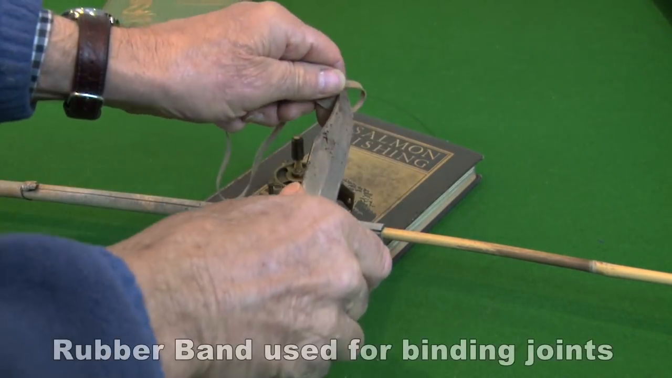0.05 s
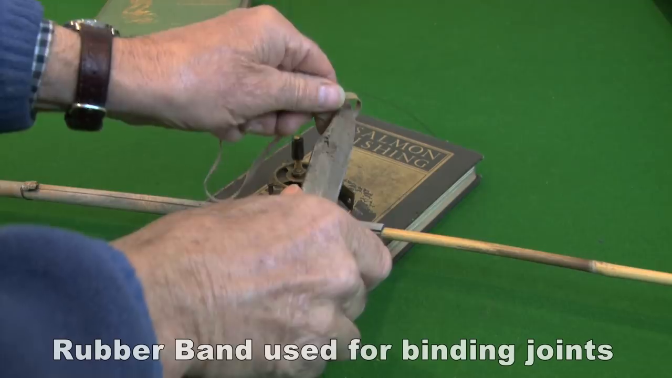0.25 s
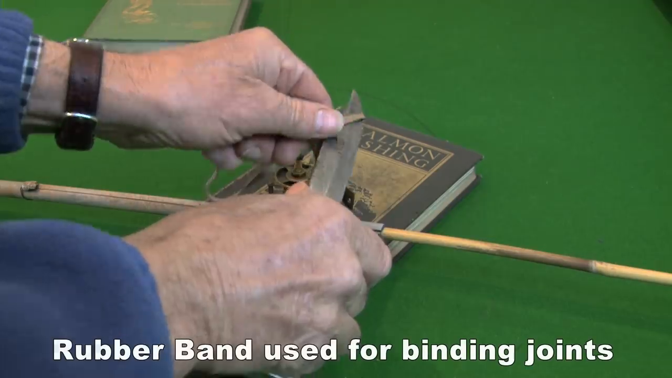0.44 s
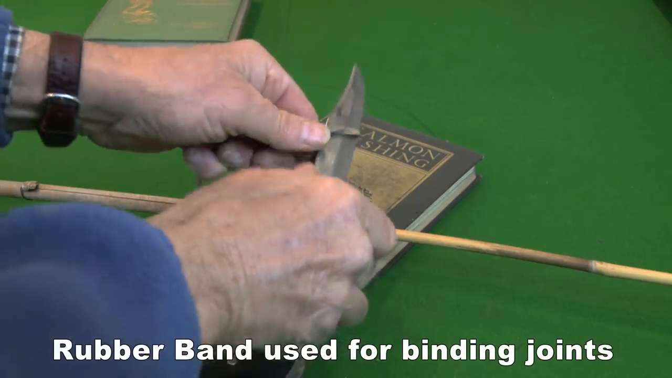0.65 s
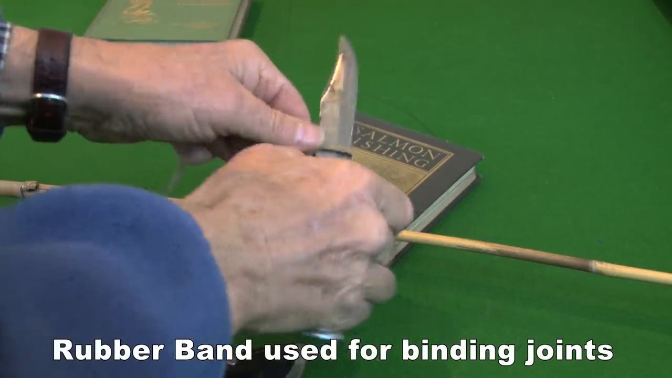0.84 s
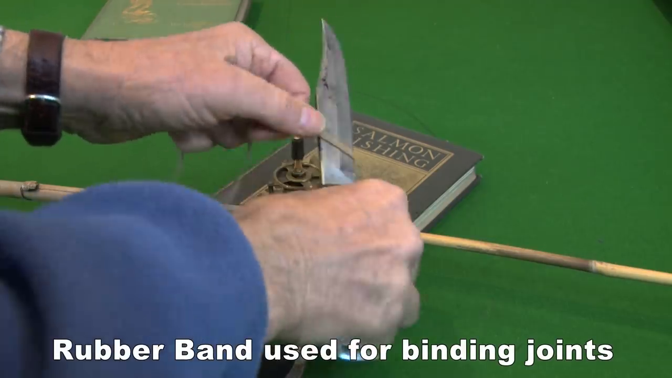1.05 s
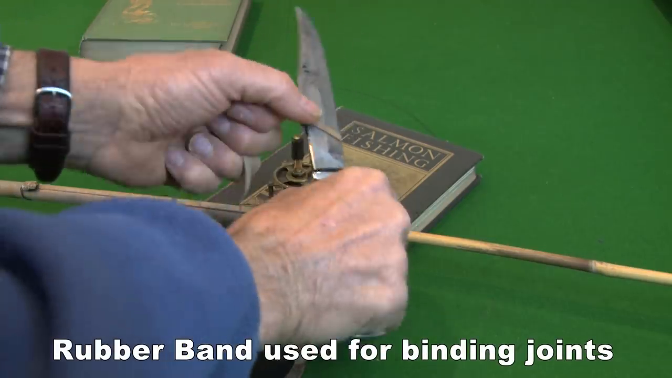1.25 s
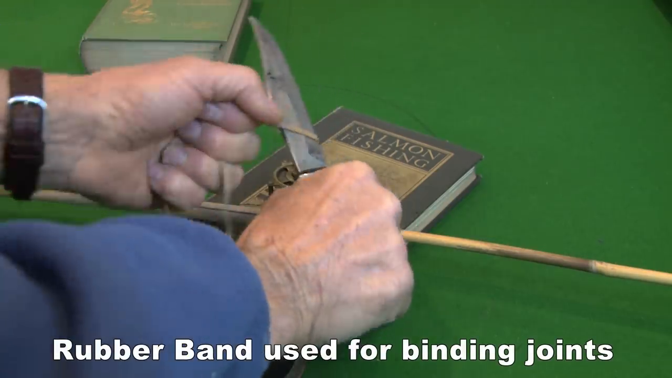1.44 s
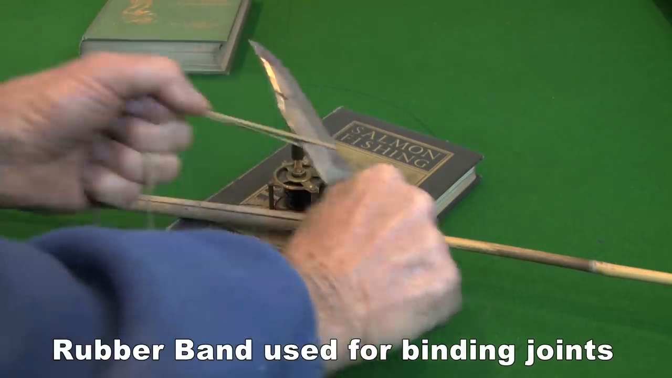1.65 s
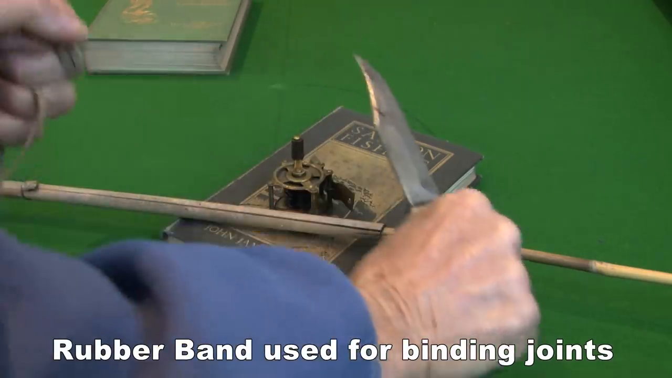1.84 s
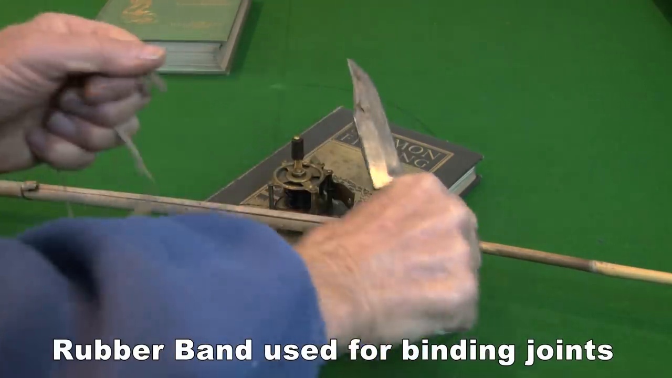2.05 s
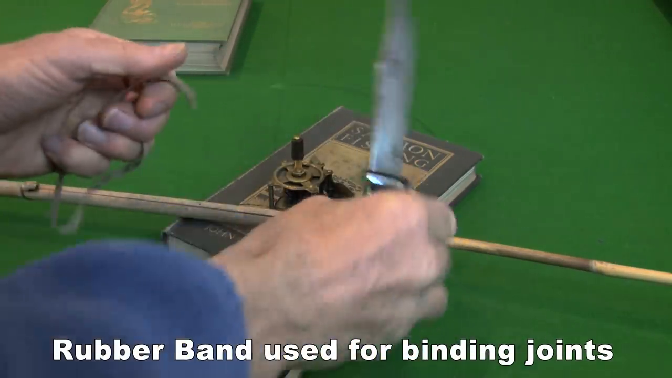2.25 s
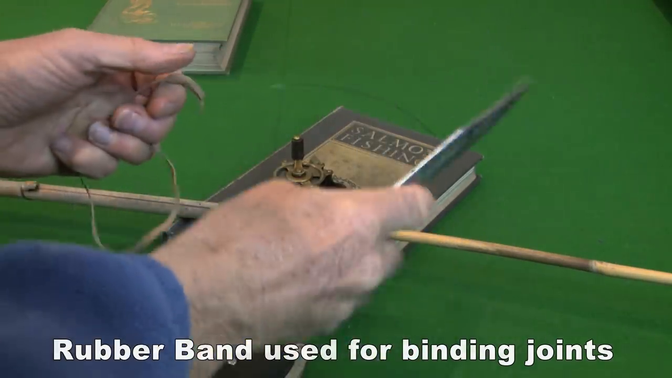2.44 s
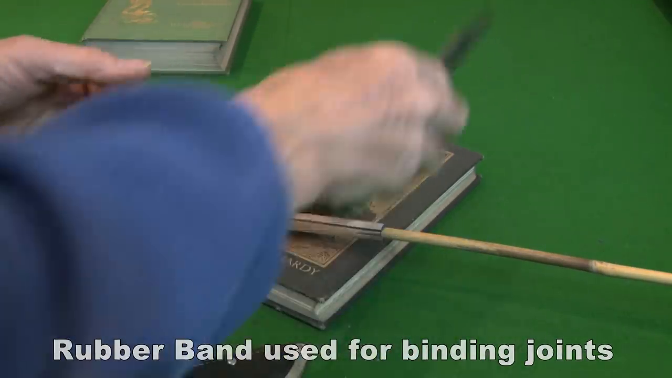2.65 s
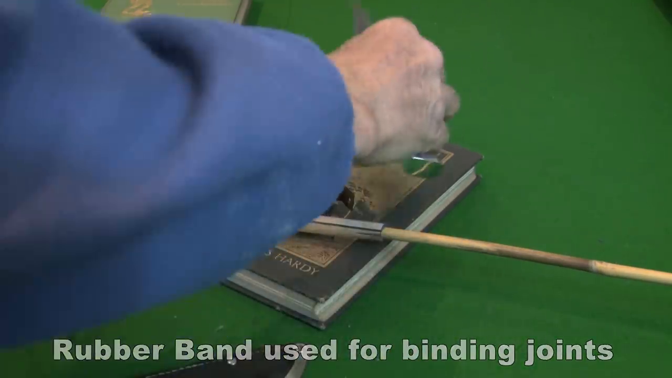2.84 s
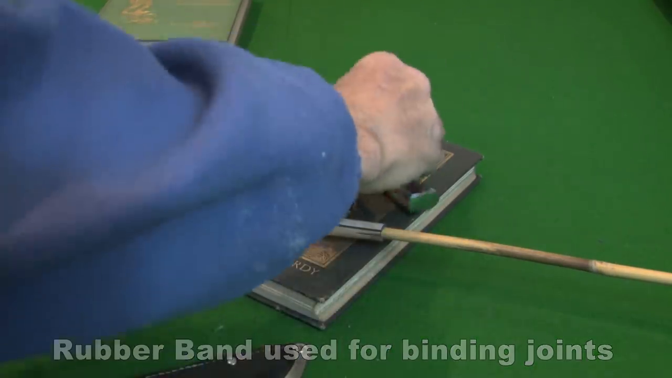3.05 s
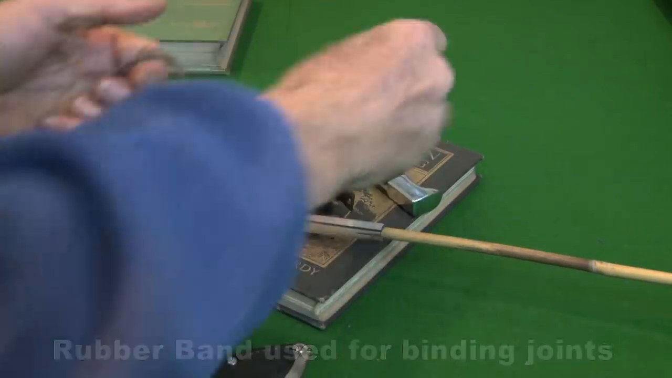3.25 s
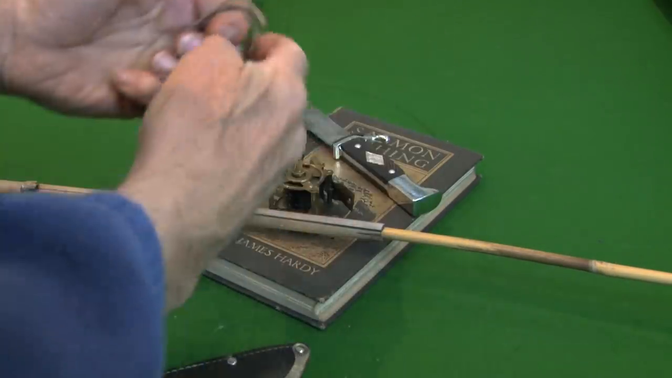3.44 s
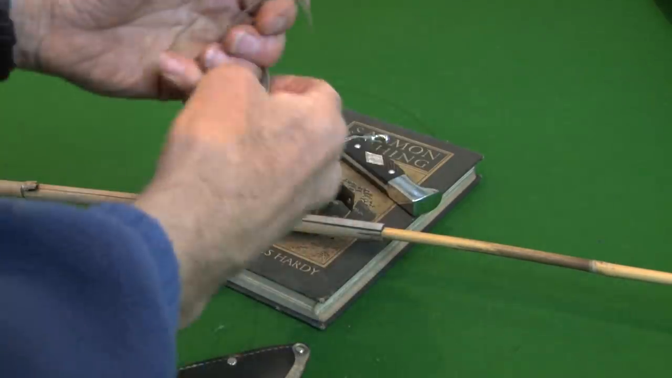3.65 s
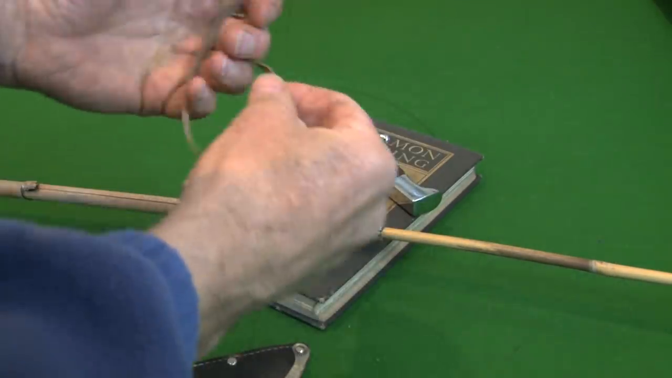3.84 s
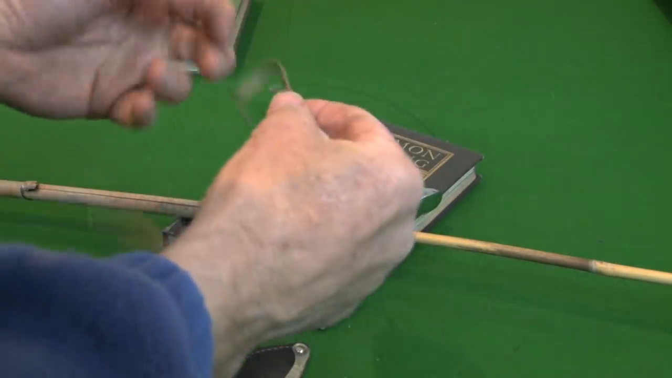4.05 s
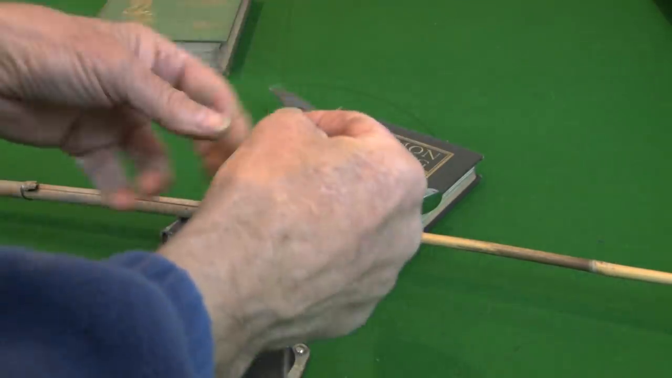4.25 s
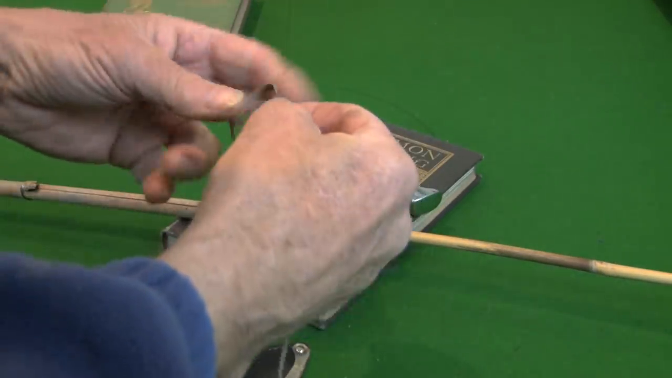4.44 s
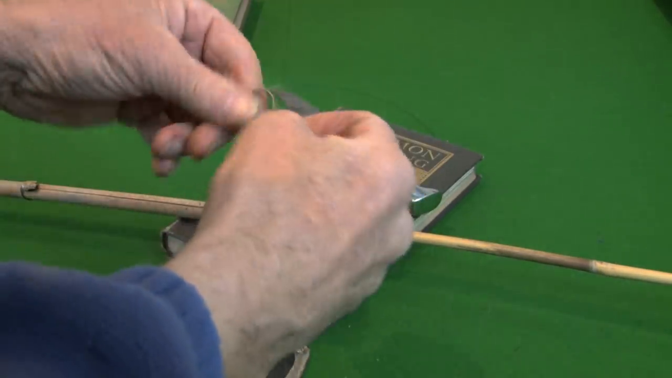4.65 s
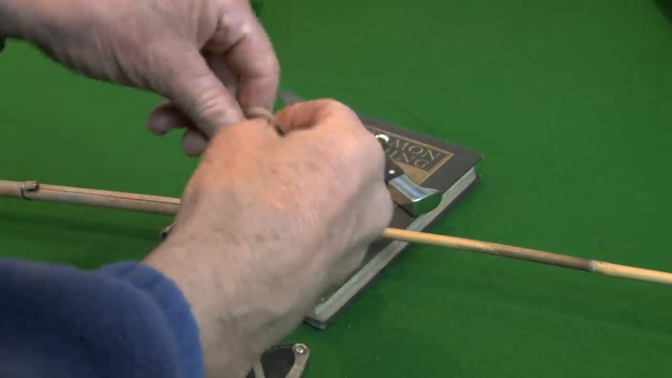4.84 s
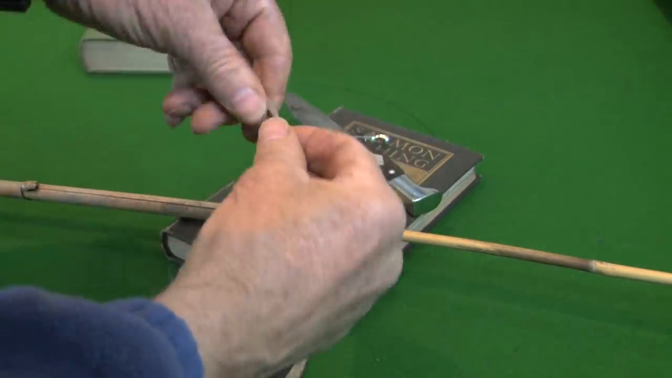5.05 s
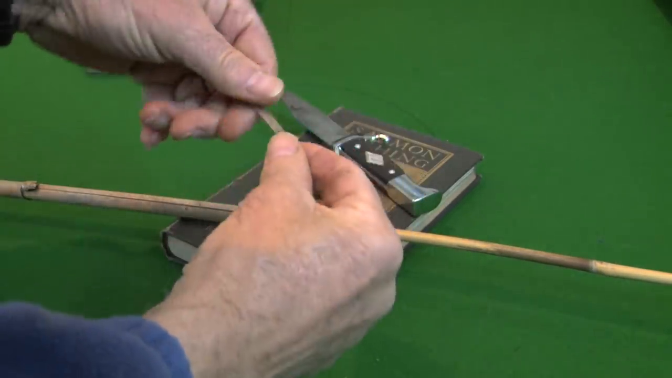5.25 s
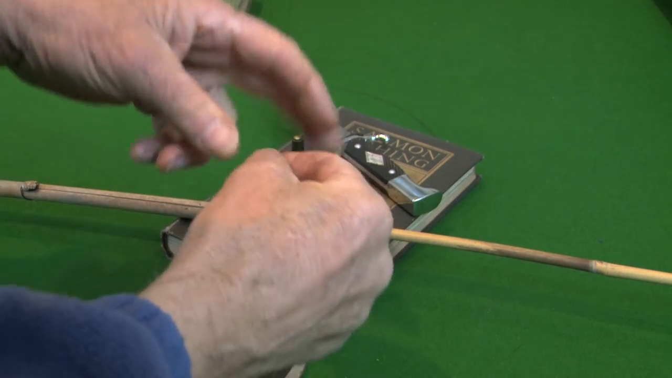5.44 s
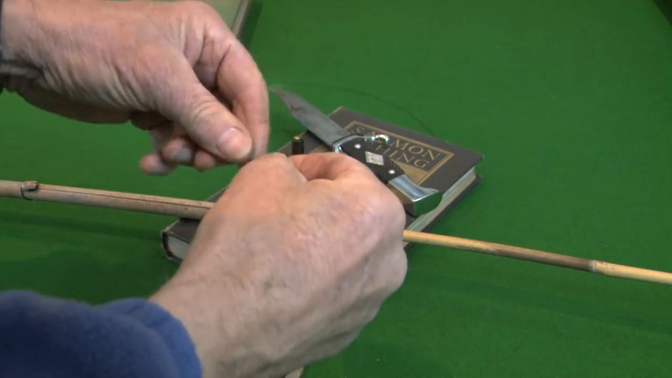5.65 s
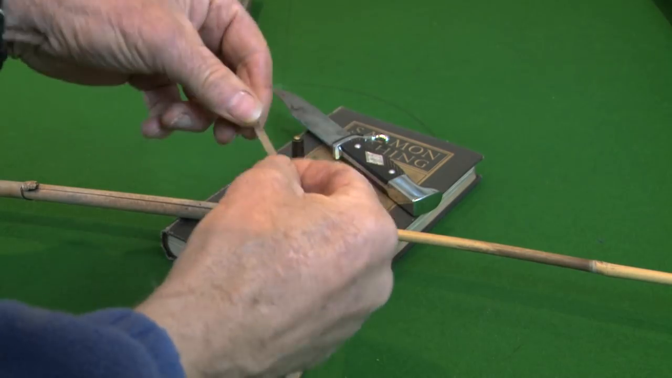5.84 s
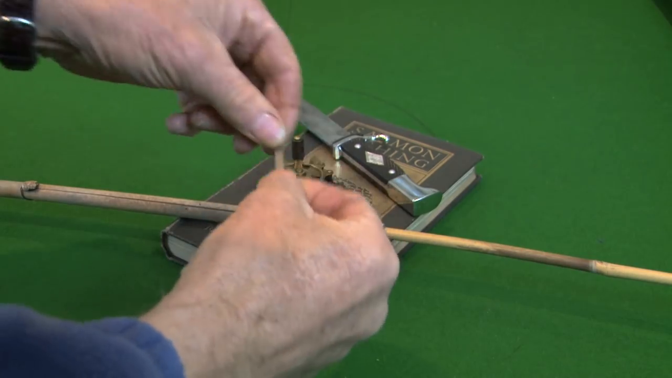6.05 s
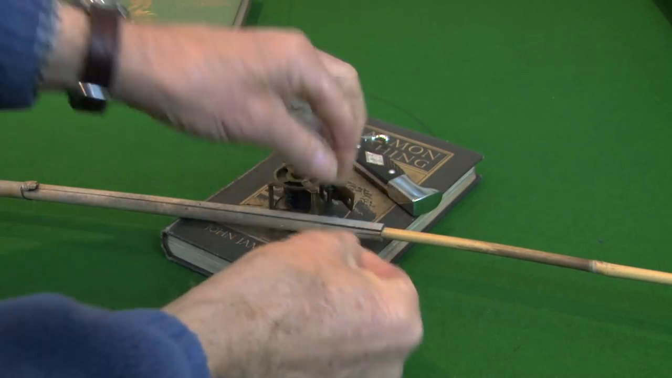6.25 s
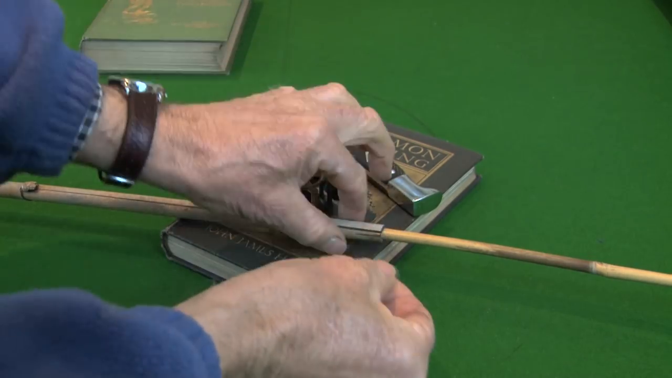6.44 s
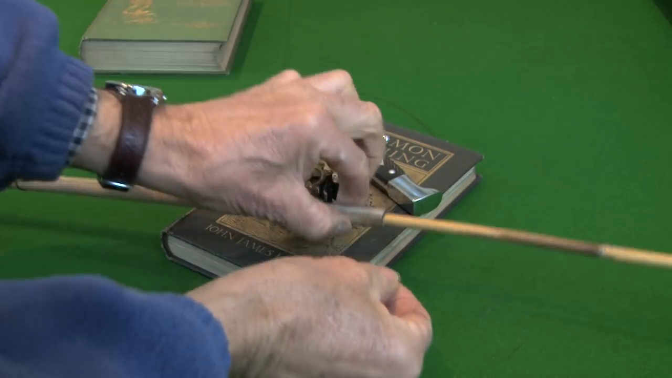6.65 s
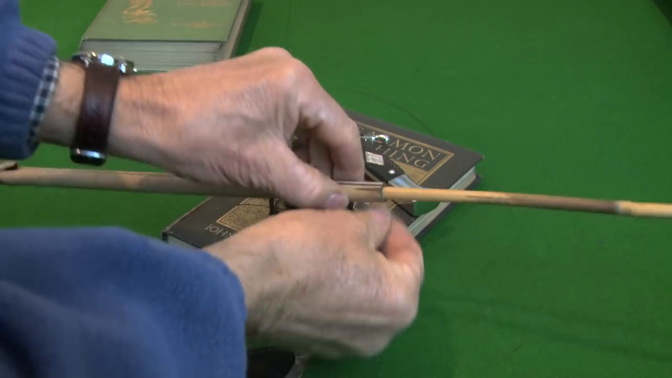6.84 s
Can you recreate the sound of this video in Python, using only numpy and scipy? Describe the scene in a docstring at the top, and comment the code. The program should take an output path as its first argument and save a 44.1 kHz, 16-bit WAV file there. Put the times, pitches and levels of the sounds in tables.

```python
"""A stretched rubber band is cut on a knife in a quiet furnished room, over a low rumble and a faint hiss.
Fingers rub and sleeves drag; near 1 s the taut band slides down the blade and squeaks. At 1.7 s it parts
with a dry crack and a puff of air. Around 3 s the knife is laid rocking on a hardback book, whose modes
knock under it. Near 4 s the rubber strip is drawn through the fingers and slips off with a creak. Small
things tick, and a few light knocks follow at 6.4 s. A closely spaced microphone pair hears it all."""
import sys
import numpy as np
from scipy import signal
from scipy.io import wavfile

SR = 44100
rng = np.random.default_rng(int(sys.argv[2]) if len(sys.argv) > 2 else 0)


def generate_wav(sig):
    """Save sig (samples, or channels by samples) to the path in sys.argv[1] as 16-bit PCM at SR."""
    pcm = np.round(np.clip(np.atleast_2d(sig).T, -1, 1) * 32767).astype(np.int16)
    wavfile.write(sys.argv[1], SR, pcm)


N = 304290

SNAP_DB = 6   # gain on the whole snap, on top of the levels below
PUFF_DB, PUFF_HZ = -45, 45.32   # the hands jerk apart and a puff of air reaches the microphones
OVERTONE_RATIO, OVERTONE_DB = 1.9, -6
# The parting band whips against blade and fingers within four milliseconds.
# Each row: start in seconds, crack level in dB, crack pitch in Hz, air push level in dB.
WHIPS = [(1.7206, -15, 4300, -20), (1.72165, -6, 6600, -10), (1.7223, -14, 6900, -22),
         (1.72255, -11, 2400, -30), (1.7231, -14, 4800, -26), (1.7243, -27, 6900, -40)]
def band_snap():
    """Each whip is a crack of a few cycles riding on a slower push of air; only the cracks echo."""
    cracks, pushes = np.zeros((2, N))
    t = np.arange(SR // 10) / SR
    for s, crack_db, hz, push_db in WHIPS:
        t60 = 5 / hz
        crack = ring(hz, t60, t) - from_db(OVERTONE_DB) * ring(OVERTONE_RATIO * hz, t60, t)
        add(cracks, s, -from_db(crack_db) * crack)
        add(pushes, s - .0005, from_db(push_db) * ring(600, .003, t))
    add(pushes, WHIPS[1][0], from_db(PUFF_DB) * ring(PUFF_HZ, 0.1, t))
    left = signal.lfilter([.7, .3], [1], cracks)   # reaches the left microphone 0.3 samples later
    crack_pair = panned(np.array([left, cracks]), pan_db=-.6)
    return from_db(SNAP_DB) * (echoes(crack_pair) + panned(pushes, pan_db=2.0))


def snap_in_room(db=6.5, low_cut_hz=496):
    """Towards the walls the whips merge into one broad crack, thin in the bass."""
    out = np.zeros(N)
    add(out, WHIPS[1][0], from_db([db]))
    return butter(out, 1, low_cut_hz, "high")


RATTLE_DB, RATTLE_T60_S = -9, 0.081   # the knife's rattle, against its edge clack
COVER_HZ, KNOCK_TOP_HZ = 3400, 11500   # the yielding, cloth-covered board dulls each knock
# The modes of the book, then of the knife's hard edge.
# Each row: pitch in Hz, level in dB, time to fall 60 dB in seconds.
BOOK_MODES = [(60.8, -25, 0.69), (107, -21, 0.27), (211.7, -5, 0.042), (302, -3.5, 0.022),
              (414, -5.5, 0.035), (560, -2, 0.013), (884, 7.5, 0.006), (1005, 9, 0.0061), (1328, 2, 0.013),
              (1470, -0.5, 0.011), (2120, -9.5, 0.0054)]
EDGE_MODES = [(2710, -0.5, 0.0055), (3100, -7.5, 0.0038)]
# Hard things land on book and table. Each row: start in seconds, level in dB, contact sharpness in Hz,
# then trims in dB for the edge clack, the two lowest modes and the cover's drum tone.
KNOCKS = [(1.9927, -35.5, 383, -33, -3.5, 2), (2.9930, -23.5, 413, -16.5, -6, -3),
          (3.0251, -18, 1730, -8, -20, 2), (3.031, -26.5, 910, -31, 14, 7.5),
          (3.037, -23, 1000, -16, 9.5, 1), (3.0670, -25, 590, -35, -14, 1),
          (3.0731, -17.5, 1380, -19, -16, -2), (3.0850, -23.5, 900, -13, -17, 2),
          (3.0915, -25.5, 900, -6, 9, 4.5), (3.1451, -21.5, 1110, -18.5, -3, -2),
          (3.1769, -26, 700, -18, 6.5, -1), (6.392, -50, 1500, -18, -15, -2),
          (6.4455, -33.5, 630, -29, -20, -2), (6.4846, -38, 480, -25, -10, -12),
          (6.509, -39.5, 700, -16, 4, 1), (6.516, -42, 700, -20, -17, -10),
          (6.529, -40.5, 690, -19, -20, 2.5), (6.541, -45, 900, -26, -20, 0)]
def knocks():
    """A soft contact excites the book's modes anew each time; a hard edge clacks and rattles on top."""
    out, t = np.zeros(N), np.arange(SR // 2) / SR
    scatters_db = rng.normal(0, 1.5, (len(KNOCKS), len(BOOK_MODES)))
    rattles = np.diff(rng.standard_normal((len(KNOCKS), len(t) + 1)))
    rattles *= from_db(RATTLE_DB - 60 * t / RATTLE_T60_S)
    clack = sum(from_db(db) * ring(hz, t60, t) for hz, db, t60 in EDGE_MODES)
    for knock, scatter_db, rattle in zip(KNOCKS, scatters_db, rattles):
        s, db, sharp_hz, edge_db, weight_db, drum_db = knock
        body = 0
        for k, (hz, mode_db, t60) in enumerate(BOOK_MODES):
            trim_db = scatter_db[k] + weight_db * (k < 2) + drum_db * (k == 2)
            strength = from_db(mode_db + trim_db) / (1 + (hz / sharp_hz) ** 2)
            body += strength * (-1) ** k * ring(hz, t60, t)   # neighbours start in opposite senses
        body = butter(body, 1, 2.25 * sharp_hz)   # the contact time rounds the onset
        add(out, s, -from_db(db) * (body + from_db(edge_db) * (clack + rattle)))
    return below(KNOCK_TOP_HZ, butter(out, 3, COVER_HZ))


LOWER_RING_RATIO = 0.387
# Nails, rubber and metal tick; the row at 4.457 s is instead a faint, lingering tone near 1.7 kHz.
# Each row: start in seconds, level in dB, pitch in Hz, resonance Q,
# time for the wake to fall 60 dB in seconds, lower ring in dB against the upper.
TICKS = [(0.923, -52.5, 6500, 1, 0.011, -9), (2.165, -63.5, 7200, 5.7, 0.027, -30),
         (2.184, -57, 8060, 1.7, 0.019, -29.5), (2.225, -54.5, 7100, 1.2, 0.0055, -33),
         (2.231, -53, 7800, 1.8, 0.0054, -28), (2.307, -59.5, 7130, 1.1, 0.0052, -30),
         (2.444, -62.5, 4200, 9.2, 0.022, -16.5), (2.623, -61, 4250, 13, 0.028, -35),
         (3.0262, -46.5, 6400, 2.4, 0.0035, -32), (3.0738, -42, 7800, 1.7, 0.0035, -28),
         (3.0746, -41, 4440, 2, 0.0031, 4), (4.0439, -38, 3100, 3.1, 0.001, -27),
         (4.0442, -39, 1900, 0.94, 0.0011, -30), (4.148, -46.5, 1320, 3, 0.0059, -7.5),
         (4.1692, -41, 2400, 2.3, 0.0096, -9), (4.172, -41, 5430, 0.78, 0.0095, -23),
         (4.457, -64, 1740, 7.6, 0.51, -34), (5.278, -51, 7100, 0.38, 0.06, -29.5),
         (5.283, -47.5, 6840, 0.56, 0.022, -4.5), (5.668, -51, 6000, 0.35, 0.021, -5),
         (6.388, -57, 6730, 0.7, 0.051, -14), (6.4473, -49, 2520, 0.36, 0.0052, -25),
         (6.511, -64, 2800, 4.5, .02, -9), (6.517, -55, 4300, 2.6, 0.036, -30),
         (6.522, -61, 1970, 5, 0.066, -30), (6.53, -54, 4400, 1.1, 0.013, -14)]
def ticks():
    """A sharp click with a noisy wake rings an upper and a lower resonance."""
    out, t = np.zeros(N), np.arange(SR // 5) / SR
    for s, db, hz, q, t60, lower_db in TICKS:
        wake = rng.standard_normal(len(t)) * from_db(-60 * t / t60)
        burst = 2.6 * (t == 0) + wake
        for ring_hz, ring_db in [(hz, db), (LOWER_RING_RATIO * hz, db + lower_db)]:
            peak = np.concatenate(signal.iirpeak(ring_hz, q, fs=SR))
            rung = signal.sosfilt([peak] * 3, burst)
            add(out, s, from_db(ring_db) * rung / np.max(np.abs(rung)))
    return out


def creak(start_s=4.047, end_s=4.125, slips_per_s=83, db=-51, hz=9650):
    """Rubber slips off skin in a short, slightly uneven train of bright clicks."""
    out, t = np.zeros(N), np.arange(SR // 200) / SR
    for s in np.arange(start_s, end_s, 1 / slips_per_s):
        late, size = rng.standard_normal(2)
        add(out, s + 0.00084 * late, from_db(db + 2.7 * size) * ring(hz, 0.00094, t))
    return out


WAVER_DB = 3.0   # each squeak and each blade mode comes and goes by itself
# The band rubs along the blade. Each row: start in seconds, hold in seconds, level in dB.
SLIDES = [(0.925, 0.05, -68), (0.985, 0.112, -64), (1.12, 0.059, -71)]
# The colour of that rub. Each row: centre in Hz, width in Hz, level in dB.
SLIDE_MODES = [(937, 40, -14), (2370, 120, -12), (1300, 1800, 0)]
# The band groans and squeaks as it slips.
# Each row: start in seconds, hold in seconds, level in dB, pitch in Hz, pitch wander in Hz.
SQUEAKS = [(0.975, .045, -65, 668, 40), (1.04, .17, -68, 665, 70), (0.935, .06, -69, 1815, 20),
           (1.01, .15, -73, 1840, 20), (1.0, .135, -67, 1494, 8)]
def sliding_band():
    """The taut band slides down the blade and sings: wavering tones over a broad rub."""
    slopes = dict(rise_db_per_s=510, fall_db_per_s=148)
    tones = sum(strokes([(s, hold, db)], **slopes) * squeak(hz, wander_hz)
                for s, hold, db, hz, wander_hz in SQUEAKS)
    return strokes(SLIDES, **slopes) * resonant(SLIDE_MODES) + tones


def squeak(hz, wander_hz, wanders_per_s=70):
    """A tone of slipping rubber whose pitch and strength waver; rms 1."""
    phase = 2 * np.pi * np.cumsum(hz + wander_hz * drift(wanders_per_s)) / SR
    return rms_one(from_db(WAVER_DB * drift(wanders_per_s)) * np.sin(phase))


# The modes of the knife blade. Each row: centre in Hz, width in Hz, level in dB.
BLADE_MODES = [(3140, 110, 2.5), (4200, 250, 0.5), (5450, 220, -3), (6800, 260, 5), (7300, 240, 0),
               (8050, 240, -2), (10600, 600, -4)]
# Fingers and rubber brush the blade.
# Each row: start in seconds, hold in seconds, level of the lower modes in dB, of the upper modes in dB.
BRUSHES = [(0.352, 0.08, -88, -83), (0.448, 0.1, -81, -80), (0.67, 0.069, -86, -81),
           (0.92, 0.035, -77, -76), (1.0, 0.062, -76, -79), (1.093, 0.034, -75, -87),
           (2.376, 0.045, -78, -98), (2.505, 0.024, -85, -89), (2.597, 0.092, -77, -75)]
def blade(split_hz=5000):
    """The brushed blade hisses in its own modes; the lower and upper ones are roused differently."""
    slopes = dict(rise_db_per_s=294, fall_db_per_s=200)
    lower = resonant([mode for mode in BLADE_MODES if mode[0] < split_hz], WAVER_DB)
    upper = resonant([mode for mode in BLADE_MODES if mode[0] > split_hz], WAVER_DB)
    lower_gain = strokes([(s, hold, db) for s, hold, db, _ in BRUSHES], **slopes)
    upper_gain = strokes([(s, hold, db) for s, hold, _, db in BRUSHES], **slopes)
    return lower_gain * lower + upper_gain * upper


# The hollow of the cupped hands. Each row: centre in Hz, width in Hz, level in dB.
HAND_MODES = [(2800, 650, 0), (3850, 400, -7), (5100, 800, -4), (6300, 1200, -10)]
# The pull on the strip. Each row: start in seconds, hold in seconds, level in dB.
STRIP_PULL = [(3.9, 0.1, -70.5)]
def drawn_strip():
    """The rubber strip is drawn through the fingers, ever faster, and let go: a slow swell of noise."""
    return strokes(STRIP_PULL, rise_db_per_s=24, fall_db_per_s=200) * resonant(HAND_MODES)


TREBLE_SPLIT_HZ, RUB_REST_DB = 9050, -92
# The colour of skin friction. Each row: frequency in Hz, spectral level in dB.
FINGER_TONE = [(2650, -39), (4500, -4), (4720, -6.5), (5300, -3.5), (6820, -3), (7590, -4), (9120, -6),
               (10400, -5), (14300, -7.5)]
# The first row is a brief bright click at the very start; in the rest, fingers rub on rubber and skin.
# Each row: start in seconds, hold in seconds, level in dB, trim of the top treble in dB.
RUBS = [(-0.003, 0.007, -70.5, -10), (0.184, 0.0086, -80.5, -4), (0.4, 0.14, -82.5, -3),
        (0.652, 0.16, -81.5, -1), (0.922, 0.03, -72.5, 4), (0.99, 0.23, -82, 3), (1.243, 0.59, -81.5, -10),
        (2.047, 0.087, -81.5, -3), (2.138, 0.28, -77.5, -9), (2.504, 0.014, -76, -2),
        (2.566, 0.078, -80, -2), (2.705, 0.49, -76.5, -16), (3.452, 0.081, -80.5, -1),
        (3.659, 0.27, -79, -0.5), (4.007, 0.075, -81.5, 3.5), (4.536, 0.015, -81.5, 5),
        (4.98, 0.22, -81, 3.5), (5.52, 0.086, -81, 5), (5.68, 0.059, -85, 6), (6.16, 0.08, -82.5, 3.5),
        (6.406, 0.031, -75.5, 1), (6.756, 0.041, -84.5, 1.5), (6.876, .06, -67, -10)]
def fingers(slips_per_s=300):
    """Skin friction: bright noise with tiny slips in it; some rubs are brighter than others."""
    slipping = rng.random(N) < slips_per_s / SR
    slips = slipping * from_db(1.5 * np.minimum(rng.exponential(1, N), 4))
    grain = 1 + .3 * signal.lfilter([1], [1, -.97], slips)
    noise = rms_one(grain * steady(FINGER_TONE, patchy_db=2.2, rate=16))
    body, top = below(TREBLE_SPLIT_HZ, noise), butter(noise, 8, TREBLE_SPLIT_HZ, "high")
    slopes = dict(rise_db_per_s=407, fall_db_per_s=260)
    body_gain = strokes([(s, hold, db) for s, hold, db, _ in RUBS], **slopes)
    top_gain = strokes([(s, hold, db + top_db) for s, hold, db, top_db in RUBS], **slopes)
    rest = from_db(RUB_REST_DB)
    return (body_gain + rest) * body + (top_gain + rest) * top


# The colour of rustling cloth. Each row: frequency in Hz, spectral level in dB.
SLEEVE_TONE = [(180, -30), (300, -2.5), (422, 1), (695, -2), (836, -2), (2880, -7.5), (3570, -12),
               (4290, -12), (6870, -19.5), (9000, -21), (11700, -56), (19800, -120)]
# The rustle swells and sinks. Each row: time in seconds, level in dB.
SLEEVE_LEVELS = [(0.0, -77), (0.3, -100), (0.5, -75), (0.88, -74), (1.35, -66.5), (1.7, -65), (2.1, -70.5),
                 (2.46, -76.5), (2.65, -66), (2.85, -63.5), (2.98, -71), (3.4, -66), (3.6, -71.5),
                 (4.07, -66.5), (4.26, -73), (5.45, -76.5), (5.61, -72), (6.05, -80), (6.44, -69),
                 (6.9, -65)]
def sleeves():
    """Sleeves drag on the cloth of the table with a soft friction noise."""
    return level(SLEEVE_LEVELS) * steady(SLEEVE_TONE, patchy_db=1.0, rate=15)


# The colour of the rumble. Each row: frequency in Hz, spectral level in dB.
RUMBLE_TONE = [(12, -43), (20, -14), (65, 0), (107, -2.5), (168, -5.5), (192, -4), (229, -12.5), (278, -13),
               (323, -23.5), (353, -21), (435, -16), (528, -14), (700, -27.5), (910, -59.5), (1540, -120)]
# The rumble rings in the room. Each row: centre in Hz, width in Hz, level in dB.
ROOM_MODES = [(64, 16, -4), (105, 18, 0), (168, 26, 0), (280, 40, -10)]
# The rumble's swells. Each row: time in seconds, level of the deep part in dB, of the upper part in dB.
RUMBLE_LEVELS = [(0.0, -69.5, -74.5), (0.4, -70, -69.5), (0.75, -73.5, -73.5), (1.181, -74.5, -68.5),
                 (1.45, -73.5, -74), (1.679, -71, -73.5), (2.05, -78, -75), (2.3, -67.5, -69),
                 (2.7, -63, -73.5), (2.97, -72, -72.5), (3.45, -65, -66.5), (3.85, -61.5, -63),
                 (4.151, -67, -64.5), (4.44, -74.5, -65), (4.85, -70.5, -64), (5.3, -71, -66),
                 (5.9, -70, -62.5), (6.191, -68, -72.5), (6.5, -67, -69), (6.9, -77, -67)]
def rumble(split_hz=135, modes_db=-2):
    """Low room noise with a few ringing pitches; its deep and upper parts swell separately."""
    noise = steady(RUMBLE_TONE, patchy_db=2.0, rate=2.9) + from_db(modes_db) * resonant(ROOM_MODES)
    deep, upper = (rms_one(butter(noise, 4, split_hz, kind)) for kind in ("low", "high"))
    s, deep_db, upper_db = np.transpose(RUMBLE_LEVELS)
    return level(np.c_[s, deep_db]) * deep + level(np.c_[s, upper_db]) * upper


# The colour of the background hiss. Each row: frequency in Hz, spectral level in dB.
HISS_TONE = [(120, -56), (200, -10), (354, -7.5), (698, -10), (806, -3.5), (1280, -15), (3080, -19.5),
             (3490, -23.5), (6750, -32), (12800, -28.5), (14300, -49)]
def hiss(db=-73.5):
    """A faint, slightly wavering bed of noise."""
    return from_db(db) * steady(HISS_TONE, patchy_db=1.5, rate=7.2)


# Early reflections. Each row: delay in seconds, level in dB, left over right in dB.
ECHOES = [(.0055, -23, 5), (.0078, -19, -4), (.0103, -12, 2), (.0122, -14, 5), (.0168, -19, -5),
          (.0197, -19, 4)]
def echoes(x, echo_db=0, top_hz=8650):
    """The direct sound and its first, duller echoes off table and walls."""
    response = np.zeros((2, SR // 20))
    for s, db, pan_db in ECHOES:
        response[:, round(s * SR)] += from_db(db + echo_db + np.array([.5, -.5]) * pan_db)
    return x + signal.fftconvolve(x, butter(response, 2, top_hz), axes=1)[:, :N]


# The colour of the room's tail. Each row: frequency in Hz, level in dB.
ROOM_TONE = [(40, -6.5), (150, -3), (600, 5.5), (2500, 4.5), (7000, -0.5), (12000, -15.5), (16000, -42.5)]
# Its length. Each row: frequency in Hz, time to fall 60 dB in seconds.
ROOM_T60 = [(60, 1), (200, 0.65), (500, 0.41), (2000, 0.44), (5000, 0.41), (8000, 0.3), (12000, 0.51),
            (16000, .12)]
# Its stereo image. Each row: frequency in Hz, left-right likeness from 0 to 1.
ROOM_LIKENESS = [(60, 1), (180, 0.93), (550, 0.91), (1650, 0.75), (4970, 0.52), (15000, 1)]
def reverberation(x, db=-37, build_s=0.0087, top_hz=13800):
    """A diffuse tail builds up and dies band by band; it is cut off steeply above top_hz."""
    t = np.arange(SR) / SR
    decay = lambda hz: from_db(at_hz(ROOM_TONE, hz) - 60 * t / at_hz(ROOM_T60, hz))
    tail = below(top_hz, bands(SR, ROOM_LIKENESS, decay))
    build_up = 1 - np.exp(-(t / build_s) ** 2)
    return signal.fftconvolve(x[None], from_db(db) * tail * build_up, axes=1)[:, :N]


# The stereo image of the noise beds. Each row: frequency in Hz, left-right likeness from 0 to 1.
BED_LIKENESS = [(60, 1), (180, 1), (550, 0.61), (1650, 0.5), (4970, 0.49), (15000, 1)]
def steady(tone, patchy_db, rate):
    """Noise of a given colour whose bands waver partly together; rms 1."""
    together, low, high = drift(rate), tone[0][0], tone[-1][0]
    def gain(hz):
        waver_db = patchy_db * (together + .8 * drift(rate))
        return (low < hz < high) * from_db(at_hz(tone, hz) + waver_db)
    return rms_one(bands(N, BED_LIKENESS, gain))


def bands(size, likeness, gain):
    """Third-octave bands of stereo noise, each shaped by the envelope gain(hz)."""
    edges_hz = 20 * 2 ** np.arange(0, 9.8, 1 / 3)
    out, white = 0, rng.standard_normal((2, 2, size))
    for k, (low, high) in enumerate(zip(edges_hz, edges_hz[1:])):
        hz = np.sqrt(low * high)
        envelope = gain(hz)
        if np.max(envelope) > 1e-4:
            mid, side = butter(white[k % 2], 2, [low, high], "band")
            alike = at_hz(likeness, hz)
            out += envelope * (np.sqrt(1 + alike) * mid + np.sqrt(1 - alike) * side * [[1], [-1]])
    return out


def resonant(modes, waver_db=0):
    """Noise twice through each resonance, much alike in both channels; rms 1."""
    mid, side = rng.standard_normal((2, N))
    noise, out = mid + 0.47 * side * [[1], [-1]], 0
    for hz, width_hz, db in modes:
        peak = signal.iirpeak(hz, hz / width_hz, fs=SR)
        rung = signal.lfilter(*peak, signal.lfilter(*peak, noise))
        out += from_db(db + waver_db * drift(4.7)) * rms_one(rung)
    return rms_one(out)


def ring(hz, t60, t):
    """A struck mode: a sine that falls 60 dB in t60 seconds."""
    return np.sin(2 * np.pi * hz * t) * from_db(-60 * t / t60)


def strokes(rows, rise_db_per_s, fall_db_per_s):
    """Gain over time: each stroke swells up to its start, holds and fades; the loudest one is heard."""
    t = np.arange(N) / SR
    levels_db = [db - rise_db_per_s * np.maximum(s - t, 0) - fall_db_per_s * np.maximum(t - s - hold, 0)
                 for s, hold, db in rows]
    return from_db(np.max(levels_db, axis=0))


def level(rows):
    """Gain over time from rows of seconds and dB."""
    s, db = np.transpose(rows)
    return from_db(np.interp(np.arange(N) / SR, s, db))


def drift(rate):
    """A slow random wander of spread 1, rolling off above rate in Hz."""
    step, settle = 40, 2000
    pole = np.exp(-2 * np.pi * rate * step / SR)
    slow = signal.lfilter([1], [1, -2 * pole, pole ** 2], rng.standard_normal(N // step + settle + 2))
    slow = rms_one(slow[settle:])
    return np.interp(np.arange(N) / step, np.arange(len(slow)), slow)


def at_hz(points, hz):
    """Read a table on a log-frequency axis."""
    points_hz, values = np.transpose(points)
    return np.interp(np.log(hz), np.log(points_hz), values)


def butter(x, order, hz, kind="low"):
    """A filter with a flat passband."""
    return signal.sosfilt(signal.butter(order, hz, kind, fs=SR, output="sos"), x)


def below(hz, x):
    """A steep low-pass."""
    return butter(x, 8, hz)


def panned(x, pan_db):
    """Place a sound between the microphones; positive is left."""
    return x * from_db(pan_db * np.array([[.5], [-.5]]))


def add(track, s, sound):
    """Mix a sound into a track at s seconds."""
    at = round(s * SR)
    track[at:at + len(sound)] += sound[:N - at]


def from_db(db):
    """Gain of a level."""
    return 10 ** (np.asarray(db) / 20)


def rms_one(x):
    """Scale to unit rms."""
    return x / np.sqrt(np.mean(x ** 2) + 1e-20)


KNOCK_SEND_DB, TICK_SEND_DB = -5, -12   # into the reverberation
FAINT_TOP_HZ = 14000   # the quieter layers have nothing above this
def scene():
    """Snap, knocks and ticks sound through the room, over the friction layers and the background."""
    faint = sleeves() + drawn_strip() + rumble() + hiss()
    heavy, light = knocks(), below(FAINT_TOP_HZ, ticks() + creak())
    on_table = echoes(panned(heavy, pan_db=-1.2) + light, echo_db=-3)   # less echo than the snap above
    tail = reverberation(from_db(KNOCK_SEND_DB) * heavy + from_db(TICK_SEND_DB) * light + snap_in_room())
    faint += fingers() + sliding_band() + blade()
    return band_snap() + on_table + tail + below(FAINT_TOP_HZ, faint)


CUTOFF_HZ = 16700
# Peaks and dips of the microphone housing. Each row: centre in Hz, width in Hz, gain in dB.
HOUSING = [(2868, 400, 1.5), (3480, 230, -3.5), (4250, 290, 3), (6760, 1700, 5), (9350, 880, -6),
           (11950, 410, -6), (14990, 1900, -4.5)]
def record(dry):
    """The housing colours everything, the left side is a little louder, the top is cut."""
    out = panned(dry, pan_db=.9)
    for hz, width_hz, db in HOUSING:
        band = signal.lfilter(*signal.iirpeak(hz, hz / width_hz, fs=SR), out)
        out = out + (from_db(db) - 1) * band
    return signal.sosfilt(signal.ellip(10, .5, 80, CUTOFF_HZ, fs=SR, output="sos"), out)


dry = scene()
out = record(dry)
generate_wav(out)
```